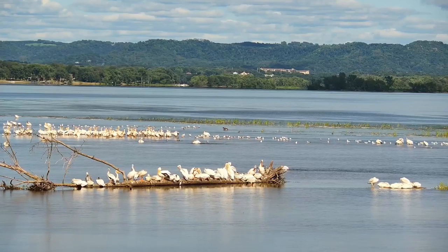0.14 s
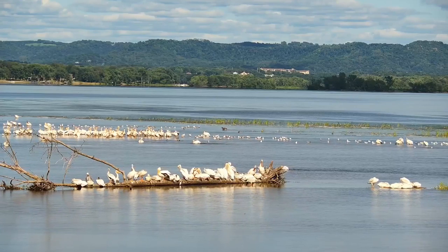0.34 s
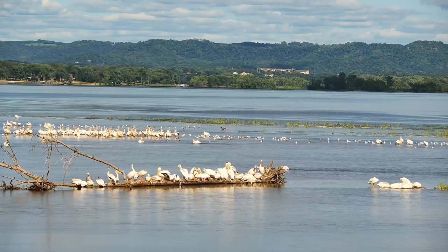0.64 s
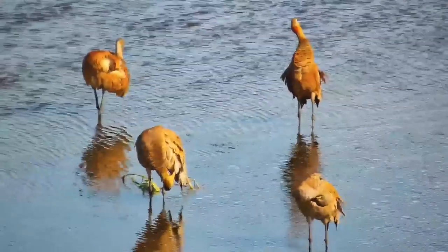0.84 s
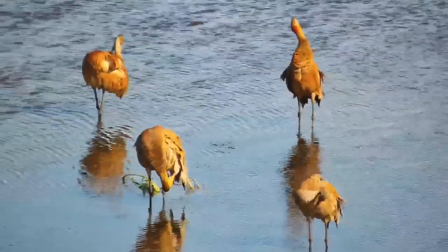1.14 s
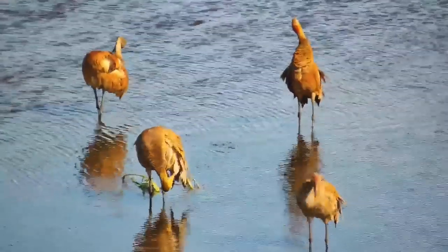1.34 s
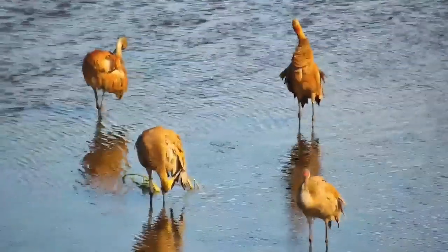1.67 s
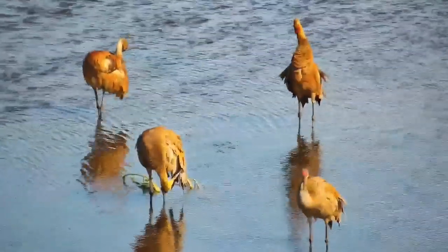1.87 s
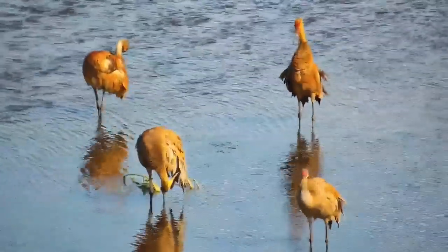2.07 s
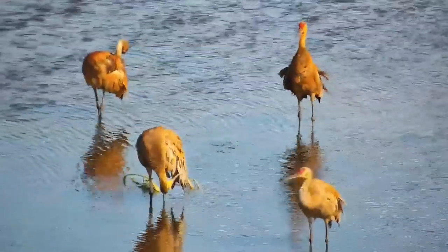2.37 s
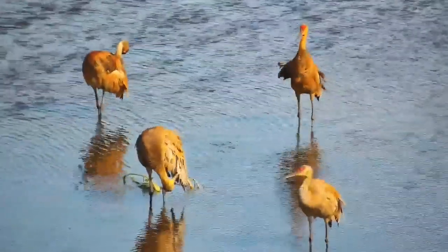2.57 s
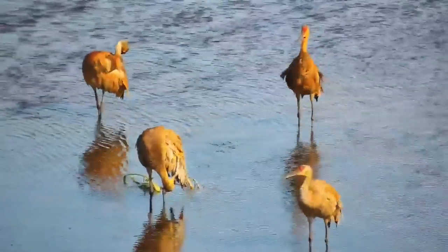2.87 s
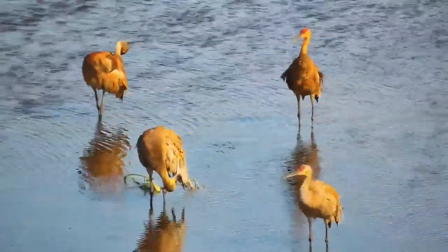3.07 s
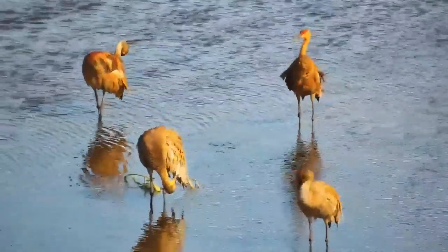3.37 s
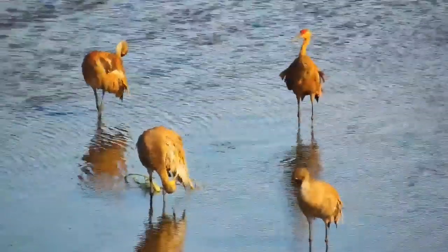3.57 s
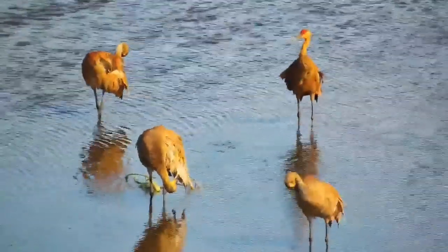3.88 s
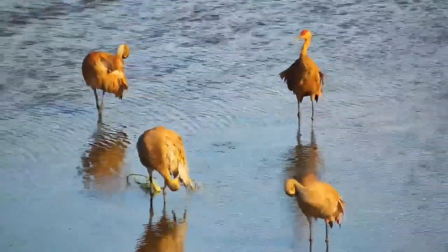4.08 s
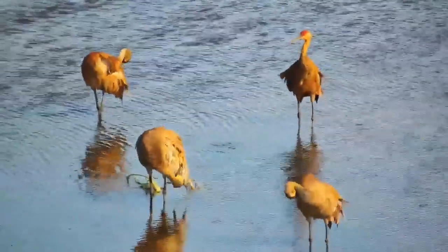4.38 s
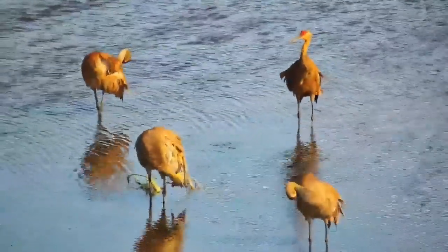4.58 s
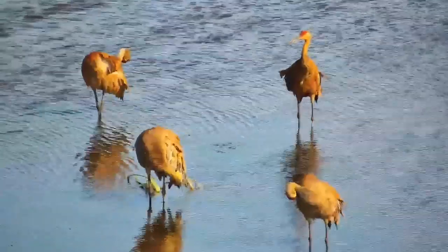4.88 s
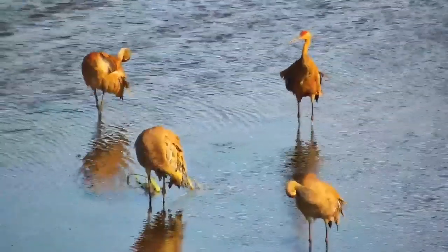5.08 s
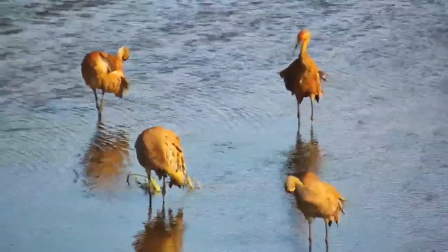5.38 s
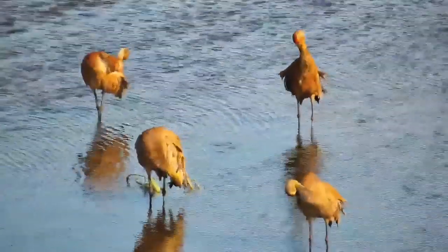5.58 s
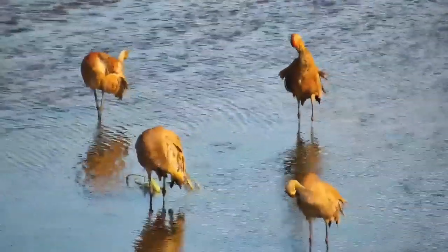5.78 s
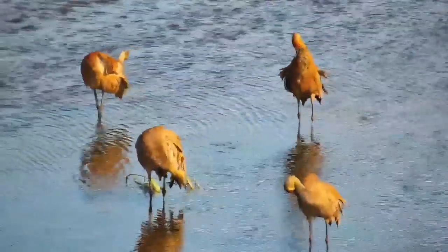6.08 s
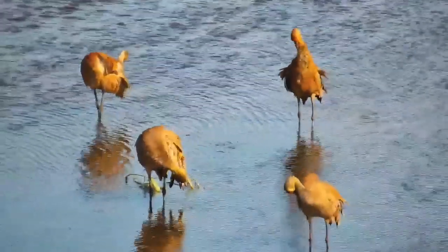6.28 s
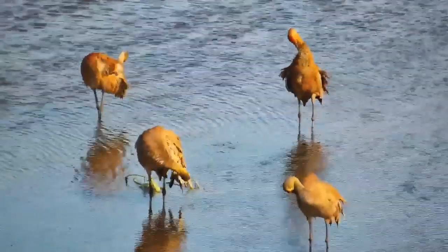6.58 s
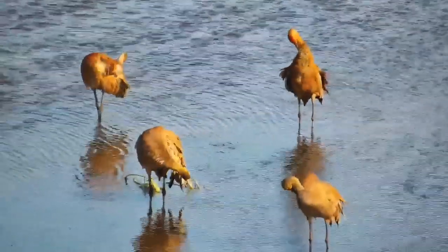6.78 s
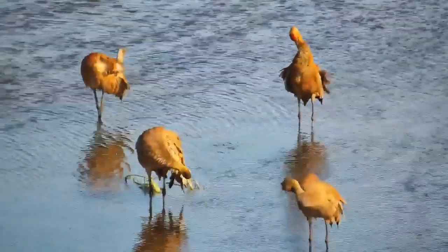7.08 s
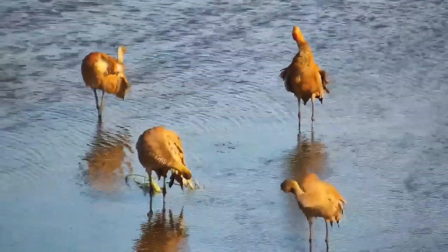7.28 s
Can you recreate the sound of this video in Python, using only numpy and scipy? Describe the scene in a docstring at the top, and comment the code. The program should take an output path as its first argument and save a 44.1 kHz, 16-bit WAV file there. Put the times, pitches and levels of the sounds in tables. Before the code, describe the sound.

Cranes call by a wide, shallow river. One repeats short hoarse yelps that break upward into clear falling notes, about two a second; another flips between low rasps and pure wails. Faint mews and low whoops answer from far off. A distant motor hums briefly at first beneath low wind rumble. The open-air microphone has light hiss, a few dull knocks, and only a faint, short echo from the banks.

```python
"""Cranes and other water birds call across a wide, shallow river. One gives runs of short yelps, each a hoarse
scrape that breaks upward into a clear falling note; another flips between a low rasp and a pure wail.
More birds answer from far off. Wind rumbles, a distant motor hums at first, the microphone hisses and takes knocks.
The bird voices are stacks of harmonics, shaken in time and strength when hoarse, and shaped by throat and bill.
Wind, hiss and knocks are filtered noise; the motor is a wavering sine; a short noise tail gives the birds an echo."""
import sys
import numpy as np
from scipy import signal
from scipy.fft import rfft, irfft, next_fast_len
from scipy.io import wavfile
from scipy.ndimage import map_coordinates

SR = 44100
rng = np.random.default_rng(int(sys.argv[2]) if len(sys.argv) > 2 else 0)


def materialize(psi):
    """Save the field psi as 16-bit PCM at rate SR to the path in sys.argv[1].

    A 1-D psi becomes a single channel; in a 2-D psi each row is a channel.
    """
    bounded = np.clip(np.atleast_2d(psi).T, -1, 1)
    quanta = np.round(bounded * 32767).astype(np.int16)
    wavfile.write(sys.argv[1], SR, quanta)


N = 327663  # length [samples]
T = np.arange(N) / SR  # time of every sample [s]

# the distant motor, before its random wavering: (time [s], pitch [Hz], level [dB])
MOTOR_COURSE = [(0, 88.9, -46.5), (.3, 89.3, -48.5), (.6, 91.5, -50.5), (.9, 91.9, -56.5), (1.2, 88, -75)]


def undb(db):
    """Turn decibels into a gain."""
    return 10 ** (np.asarray(db) / 20)


def unit(x):
    """Scale a sound to an rms (average strength) of 1."""
    return x / np.sqrt(np.mean(x ** 2) + 1e-18)


def curves(table, t):
    """Join the points in each column of a table by straight lines in time."""
    s, *columns = np.transpose(table)
    return [np.interp(t, s, c) for c in columns]


def gain_at(points, hz):
    """Read the gain at any frequency from a (frequency [Hz], gain [dB]) curve."""
    f, db = np.transpose(points)
    return undb(np.interp(np.log(np.maximum(hz, 1)), np.log(f), db))


def colour(x, points):
    """Filter a sound by a (frequency [Hz], gain [dB]) curve."""
    size = next_fast_len(len(x))
    frequencies = np.arange(size // 2 + 1) * SR / size
    return irfft(rfft(x, size) * gain_at(points, frequencies), size)[:len(x)]


def noise(points):
    """Make noise of rms 1, coloured by a gain curve."""
    return unit(colour(rng.standard_normal(N), points))


def wander(t, rate):
    """Drift smoothly and randomly around 0, through rate new values a second of spread 1."""
    place = (t - t[0]) * rate
    values = rng.standard_normal(int(place[-1]) + 2)
    return map_coordinates(values, [place], order=3, mode="nearest")


def span(start, end):
    """Give the sample times of one sound, at least 0.01 s from its start."""
    return T[max(int(start * SR), 0):int(max(end, start + .01) * SR)]


def fade(t, rise, fall):
    """Start and end a sound softly; rise and fall in seconds."""
    fade_in = np.sin(np.pi / 2 * np.clip((t - t[0]) / rise, 0, 1))
    fade_out = np.sin(np.pi / 2 * np.clip((t[-1] - t) / fall, 0, 1))
    return fade_in * fade_out


def add(out, t, x):
    """Mix a sound into the track at its own time."""
    first = int(round(t[0] * SR))
    out[first:first + len(x)] += x


def syrinx(t, hz, rough, flutter_hz, slip=1.0, shake=0.73, waver=.004):
    """Move the voice membranes: roughness makes them stumble every few cycles, with some chaos on top."""
    beat = 2 * np.pi * np.cumsum(flutter_hz * (1 + .11 * wander(t, 45))) / SR
    lag = .85 * np.sin(beat) + .25 * np.sin(2 * beat) + .5 * wander(t, 480)
    steady_phase = 2 * np.pi * np.cumsum(hz * (1 + waver * wander(t, 90))) / SR
    phase = steady_phase + slip * rough * lag
    unevenness = .75 * np.cos(beat) + .55 * wander(t, 300) + .85 * wander(t, 70)
    strength = 1 + shake * rough * unevenness
    return phase, strength


def overtones(phase, hz, throat, lowest=1, count=12):
    """Sum the membranes' harmonics from lowest to count, each weighted by the throat."""
    harmonics = range(int(lowest), count + 1)
    return np.sqrt(2) * sum(gain_at(throat, k * hz) * np.sin(k * phase) for k in harmonics)


def hiss():
    """The preamplifier's steady noise, mostly treble."""
    # shape of the hiss: (frequency [Hz], relative density [dB per Hz])
    hiss_shape = [(1060, -51), (1800, -22), (1970, -8), (2510, -12.5), (3120, -14), (4760, -8.5),
                  (5160, -6), (6890, -0.5), (9970, 1.5), (13200, 0), (15500, -1)]
    return noise(hiss_shape) * undb(-75.5)


def motor():
    """A far motor hums as a single sine, wavering a little in pitch and level."""
    hz, db = curves(MOTOR_COURSE, T)
    phase = 2 * np.pi * np.cumsum(hz * (1 + 0.02 * wander(T, 11))) / SR
    return np.sqrt(2) * np.sin(phase) * undb(db + wander(T, 6.8))


def wind(buffet_trim_db=0.5, rush_trim_db=1):
    """Wind buffets the microphone as low noise and rushes over the water as higher noise."""
    # before the trims; buffeting includes the motor's share: (time [s], buffeting [dB], rush [dB])
    wind_course = [(0.0, -45.5, -59.5), (1.06, -46.5, -59.5), (1.26, -45, -60), (2.86, -45.5, -60),
                   (3.35, -43.5, -58.5), (3.41, -48.5, -60.5), (3.68, -46, -59), (5.15, -53.5, -58.5),
                   (5.88, -47, -60), (6.41, -51.5, -60), (7.41, -50, -60.5), (7.43, -50, -57)]
    # shapes of the two noises: (frequency [Hz], relative density [dB per Hz])
    buffet_shape = [(12, -11.5), (25, -1.5), (45, -0.5), (70, 0), (110, -2.5), (150, -8.5), (190, -17),
                    (260, -32.5), (400, -66.5)]
    rush_shape = [(80, -13), (190, 2), (250, 0.5), (320, -4.5), (500, -8.5), (700, -14.5), (1000, -24),
                  (1500, -32), (2000, -48), (3000, -53)]
    buffet_db, rush_db = curves(wind_course, T)
    _, motor_db = curves(MOTOR_COURSE, T)
    # the low sound is shared between the motor and the wind
    low_power = undb(buffet_db) ** 2
    gust = np.sqrt(np.maximum(low_power - undb(motor_db) ** 2, 0.18 * low_power))
    buffeting = noise(buffet_shape) * gust * undb(buffet_trim_db)
    rush = noise(rush_shape) * undb(rush_db + rush_trim_db + 0.71 * wander(T, 5.7))
    return buffeting + rush


def background():
    """Wind and motor, faded softly at both ends, over the preamplifier's hiss."""
    return (wind() + motor()) * fade(T, .005, .005) + hiss()


def knocks():
    """Dull bumps on the microphone's body: short noise around the body frequency that dies away."""
    # (time [s], level before decay and fades [dB], body frequency [Hz], decay to about a third [s])
    knock_list = [(.163, -40.5, 230, 0.017), (0.361, -46, 256, 0.026), (0.495, -42.5, 320, 0.012),
                  (0.844, -51, 369.3, 0.0079), (5.457, -56.5, 580, 0.024), (7.004, -52, 130, 0.015)]
    # how the body rings: (multiple of the body frequency, gain [dB])
    body_shape = [(.25, -12), (1, 0), (1.5, -5), (3, -24), (8, -55)]
    out = np.zeros(N)
    for start, db, hz, decay in knock_list:
        t = span(start, start + 0.059)
        spectrum = [(hz * k, gain_db) for k, gain_db in body_shape]
        body = unit(colour(rng.standard_normal(len(t)), spectrum))
        dying = np.exp(-(t - t[0]) / decay)
        add(out, t, body * undb(db) * dying * fade(t, 0.0046, 0.017))
    return out


def shore(x, echo_db=-21, t60=0.18):
    """Faint, dull scatter from the banks: a noise tail that falls 60 dB in t60 seconds."""
    t = span(0, 0.95)
    scatter = colour(rng.standard_normal(len(t)), [(300, -1), (1500, -5), (4000, -3)])
    tail = scatter * undb(-60 * t / t60) * fade(t, 0.024, .1)
    return undb(echo_db) * signal.fftconvolve(x, tail / np.linalg.norm(tail))[:N]


def far_voice(t, hz, db, octave_db, rough, bright_db=0, third_db=-80):
    """One soft-edged call from further out: a base note, its octave and weaker overtones."""
    # overtone gains: (frequency [Hz], gain [dB])
    far_throat = [(1300, -22), (1650, -32), (1950, -26), (2400, -30), (4500, -27), (7000, -48.5)]
    phase, strength = syrinx(t, hz, rough, hz / 3, waver=0.0085)
    high = undb(bright_db) * overtones(phase, hz, far_throat, lowest=3, count=9)
    upper = np.sqrt(2) * np.sin(2 * phase) + high
    third = undb(third_db) * np.sin(3 * phase)
    voice = np.sqrt(2) * (np.sin(phase) + third) + undb(octave_db) * upper
    return voice * strength * undb(db) * fade(t, 0.018, 0.031)


def mews():
    """Distant mews: the pitch glides, with an arch that makes it lower at both ends."""
    # levels before fades: (start [s], end [s], middle pitch [Hz], glide [Hz], base note level [dB],
    # octave relative to it [dB], roughness [0-1])
    mew_list = [(0.974, 1.108, 668, -23, -67, -6, 0.2), (1.646, 1.78, 653, -23, -59, -25, .1),
                (1.988, 2.135, 790, 7, -80.5, 4.5, 0.05), (2.391, 2.447, 605, -8, -61.5, -11, 0.14),
                (2.48, 2.747, 669, 3, -70.5, -12, 0.16), (3.68, 3.839, 551, 27.5, -65.5, -6, .6),
                (3.719, 3.868, 790, -53, -66.5, -12.5, 0.25), (3.82, 4.018, 535, 60, -66.5, -4, 0.8),
                (3.977, 4.058, 800, 55, -63.5, -5.5, 0), (4.275, 4.4, 765, -5, -71, -4.5, 0.03),
                (5.143, 5.233, 640, 21, -65.5, -8.5, .12), (5.143, 5.193, 913, 140, -66.5, -9, 0.2),
                (5.219, 5.409, 676, 35.5, -66.5, -11, 0.13), (6.512, 6.682, 688, 13, -65, -13, 0.21),
                (6.63, 6.745, 802, -35, -77, -7, 0), (6.837, 6.974, 779, -24, -80, -2.5, 0.26),
                (6.924, 7.022, 635, -58, -60, -22, 0.56), (6.89, 6.991, 860, 98, -66.5, -25, 0.42),
                (7.0, 7.058, 823, 20, -57.5, -31, 0.1), (7.25, 7.357, 840, -18, -87, -6, 0)]
    arch = .04  # share of the pitch
    out = np.zeros(N)
    for start, end, pitch, glide, db, octave_db, rough in mew_list:
        t = span(start, end)
        place = np.linspace(-1, 1, len(t))
        hz = pitch * (1 - arch * place ** 2) + glide * place / 2
        add(out, t, far_voice(t, hz, db, octave_db, rough))
    return out


def whoops(rough=0.17):
    """Distant low whoops: the pitch bends upward at the end and the high overtones grow."""
    # levels before fades: (start [s], end [s], starting pitch [Hz], base note level [dB],
    # octave relative to it [dB], added third harmonic relative to it [dB])
    whoop_list = [(1.08, 1.175, 467, -63.5, -30, -35), (2.285, 2.412, 501, -59.5, -8, -15),
                  (2.489, 2.65, 440, -61.5, -20, -23), (5.16, 5.314, 474, -61.5, -15, -33)]
    rise, bend = .22, 3.0  # share of the pitch; power of the upward bend
    brighten_db = 18  # growth of the high overtones from start to end
    out = np.zeros(N)
    for start, end, pitch, db, octave_db, third_db in whoop_list:
        t = span(start, end)
        age = np.linspace(0, 1, len(t))
        hz = pitch * (1 + rise * age ** bend)
        bright_db = brighten_db * (age - .5)
        add(out, t, far_voice(t, hz, db, octave_db, rough, bright_db, third_db))
    return out


def rasps(trim_db=0.5):
    """The low register: membranes stumble about every fourth cycle, which smears the upper harmonics."""
    # (start [s], end [s], middle pitch [Hz], level before trim and shaping [dB],
    # middle roughness [0-1], swell from start to end [dB])
    rasp_list = [(1.405, 1.873, 427.2, -50, .31, 1), (2.85, 2.922, 423, -52, 0.12, 1),
                 (3.079, 3.275, 427.7, -51.5, 0.28, 1), (4.457, 4.504, 425, -55, 0.3, 0),
                 (4.672, 4.996, 419.7, -51, .4, 3.5), (6.944, 7.035, 429, -57.5, 0.87, 10)]
    # throat and bill: (frequency [Hz], gain [dB])
    rasp_throat = [(200, -28.5), (410, 3), (620, 4), (860, -6.5), (1100, -3), (1300, -30), (1550, -43.5),
                   (2000, -75), (5000, -55), (8000, -70)]
    # toward its ends a rasp is flatter (share of pitch), weaker and rougher
    sag, edge_db, edge_rough = 0.0405, -3.5, 0.37
    out = np.zeros(N)
    for start, end, pitch, db, rough, swell_db in rasp_list:
        t = span(start, end)
        place = np.linspace(-1, 1, len(t))
        edge = place ** 2
        hz = pitch * (1 - sag * edge)
        roughness = np.clip(rough + edge_rough * edge, 0, 1)
        phase, strength = syrinx(t, hz, roughness, hz / 3.9, slip=0.86, shake=0.51, waver=0.0095)
        source = strength * overtones(phase, hz, [(400, -7.5), (5000, -1.0)], count=10)
        voice = unit(colour(source, rasp_throat))
        pressure = undb(db + trim_db + edge_db * edge + swell_db * place / 2)
        add(out, t, voice * pressure * fade(t, 0.007, 0.0043))
    return out


def wails(rough=0.054):
    """The pure register: mostly base note and octave; hoarse at first, climbing, then drooping as it runs out."""
    # before the shaping below: (start [s], end [s], pitch [Hz], climb [Hz per s], base note level [dB],
    # octave relative to it [dB], brightness [dB], hoarse length [s], run-out length [s])
    wail_list = [(0.462, 0.622, 582, 109, -62, -6, -13, 0.036, 0.032),
                 (1.379, 1.423, 504, 1910, -55, -13, -11, .01, 0.0091),
                 (1.819, 2.078, 578.4, 56.3, -53, -7, 2, 0.02, .05),
                 (2.812, 2.857, 503, 2030, -56, -9.5, -6, 0.022, 0.0092),
                 (2.914, 3.105, 567, 272, -54, -9, -13, .03, .03),
                 (3.269, 3.402, 579, 263, -53, -2, -8, .001, 0.063),
                 (4.535, 4.695, 536, 290, -53.5, -10.5, -8, .002, 0.013),
                 (4.987, 5.17, 570.6, 59, -52, -6.5, -5, .001, 0.071),
                 (7.013, 7.137, 519, 220, -55.5, -5, -6, 0.037, 0.05)]
    # overtone gains: (frequency [Hz], gain [dB])
    wail_throat = [(1700, -45), (2300, -64), (3000, -47), (3500, -47), (4100, -44), (5300, -46),
                   (8000, -57)]
    overshoot, settle_s = .03, .025  # starts sharp by this share of the pitch, then settles
    droop, run_out_db = .15, -13.5  # pitch (as a share) and level sink together
    tiring_db_per_s = -11.5
    hoarseness, slow_waver = 0.34, 0.0062  # extra roughness at the start; share of the pitch
    bill_opens_db, bill_quiver_db = 15, 4  # the high overtones grow through a wail, and waver
    out = np.zeros(N)
    for start, end, pitch, climb, db, octave_db, bright_db, hoarse_length, run_out in wail_list:
        t = span(start, end)
        age = t - t[0]
        spent = np.clip(1 - (t[-1] - t) / run_out, 0, 1) ** 2
        bend = overshoot * np.exp(-age / settle_s) - droop * spent + slow_waver * wander(t, 22)
        hz = (pitch + climb * age) * (1 + bend)
        roughness = rough + hoarseness * np.exp(-(age / hoarse_length) ** 2)
        phase, strength = syrinx(t, hz, roughness, hz / 4, waver=0.0031)
        body = np.sqrt(2) * (np.sin(phase) + undb(octave_db) * np.sin(2 * phase))
        opening_db = bill_opens_db * np.linspace(-.5, .5, len(t))
        bill_db = bright_db + opening_db + run_out_db * spent + bill_quiver_db * wander(t, 30.8)
        upper = undb(bill_db) * overtones(phase, hz, wail_throat, lowest=3)
        pressure = undb(db + tiring_db_per_s * (age - age.mean()) + run_out_db * spent)
        add(out, t, (body + upper) * strength * pressure * fade(t, 0.0069, 0.0073))
    return out


def scrape(t, hz, throat, swell_db, throb_db=2.0):
    """A yelp's hoarse start: membranes lock near a third of the clear pitch, then tumble into chaos."""
    effort = np.linspace(0, 1, len(t))
    rough = .12 + .55 * effort ** 1.5
    low = hz / 3 * (.965 + .035 * effort)
    phase, strength = syrinx(t, low, rough, low / 2.6, slip=.42, shake=.6, waver=.018)
    source_shape = [(290, -11.5), (580, 5.5), (1200, 2.5), (1450, 5.5), (1800, -2.5), (3000, -4.0)]
    voice = unit(colour(strength * overtones(phase, low, source_shape, count=20), throat))
    swell = undb(swell_db * (effort - 0.72) + throb_db * wander(t, 107))
    return voice * swell * fade(t, 0.0088, 0.01)


def clear_note(t, hz, throat, octave_db, rough=0.046):
    """A yelp's clear note: it droops as it dies, and its high overtones die first as the pressure drops."""
    age = np.linspace(0, 1, len(t))
    pitch = hz * (1 + .015 * age - .12 * age ** 2.7)
    roughness = rough + .2 * np.exp(-(t - t[0]) / .005)
    phase, strength = syrinx(t, pitch, roughness, pitch / 3, waver=.002)
    base = overtones(phase, pitch, throat, count=1)
    octave = undb(octave_db) * overtones(phase, pitch, throat, lowest=2, count=2)
    upper = overtones(phase, pitch, throat, lowest=3) * undb(7.0 - 10.3 * age ** 2)
    pressure = undb(1 - 13 * age ** 2.5) * fade(t, .008, .014)
    return strength * (base + octave + upper) * pressure


def spit(t):
    """The jump between a yelp's two registers spits a short burst of treble noise."""
    treble = [(2000, -41.5), (3500, -7), (4500, 14.0), (5600, -44), (8000, -22.0), (12000, -38.5)]
    return unit(colour(rng.standard_normal(len(t)), treble)) * fade(t, 0.014, 0.0068)


def yelps(crack_db=-28):
    """A chaotic low register swells, cracks and jumps into a clear note that droops as it dies."""
    # levels before throat and shaping: (time of the break [s], hoarse length [s],
    # clear length before limits [s], clear pitch before the droop [Hz], hoarse level [dB], swell [dB],
    # clear level [dB], octave boost [dB], brightness [dB])
    yelp_list = [(0.496, 0.03, 0.086, 858, -61.5, 11, -66, 0, 5.5),
                 (1.048, 0.056, 0.062, 844, -66, 4, -62.5, 4, -15),
                 (1.277, 0.067, 0.071, 872, -49, 8, -52, 2.5, 2.5),
                 (1.825, 0.041, 0.052, 881, -58, 5, -57, -3, -2.5),
                 (2.197, 0.059, 0.05, 897, -55, 20, -55, 3.5, -0.5),
                 (2.614, 0.062, .0768, 867, -55, 0, -53, 0, -8.5),
                 (2.998, 0.055, 0.087, 858, -53.5, 8, -55.5, -1, -5.5),
                 (3.405, 0.042, 0.072, 869.4, -55.5, 4, -57.5, 0, -12),
                 (3.832, 0.067, 0.064, 895, -59.5, 11, -59.5, -6, -15),
                 (4.14, .025, .09, 922, -63, 3, -59.5, -1, -31.5),
                 (4.461, .052, 0.081, 908, -60, 11, -61, 1.5, -19),
                 (4.83, 0.026, 0.077, 889, -66, 6, -62.5, 1, -24),
                 (5.298, 0.057, .062, 838, -62.5, 3, -59, -12, -39),
                 (5.725, 0.062, 0.086, 792, -54, 14, -58.5, 3.5, -14),
                 (6.156, 0.055, 0.076, 771, -61.5, 8, -57, -3, -22)]
    # throat and bill, before brightness: (frequency [Hz], gain [dB])
    yelp_throat = [(250, 8.5), (560, 4.5), (880, 1.5), (1200, 0), (1550, -10), (1760, -19), (2100, -25),
                   (2620, -30), (3500, -35.5), (4400, -27), (5300, -29), (7000, -33), (8000, -35),
                   (11000, -80)]
    out = np.zeros(N)
    for jump, hoarse_length, clear_length, hz, hoarse_db, swell_db, clear_db, octave_db, bright_db in yelp_list:
        # a wider bill lets out more of the high overtones
        throat = [(f, db + bright_db * np.clip(np.log2(f / 1520), 0, 1)) for f, db in yelp_throat]
        t = span(jump - hoarse_length, jump + .006)
        add(out, t, scrape(t, hz, throat, swell_db) * undb(hoarse_db))
        t = span(jump - .005, jump + np.clip(clear_length, .06, .1))
        add(out, t, clear_note(t, hz, throat, octave_db) * undb(clear_db))
        t = span(jump - .012, jump + .014)
        add(out, t, spit(t) * undb(clear_db + bright_db + crack_db))
    return out


def scene():
    """Birds and their echo over knocks and background."""
    birds = mews() + whoops() + rasps() + wails() + yelps()
    return (background() + knocks() + shore(birds) + birds)[None]


def record(dry):
    """The recorder cuts the top: a steep filter removes what lies above 15700 Hz."""
    return signal.sosfilt(signal.ellip(10, .2, 70, 15700, fs=SR, output="sos"), dry)


dry = scene()
out = record(dry)
materialize(out)
```